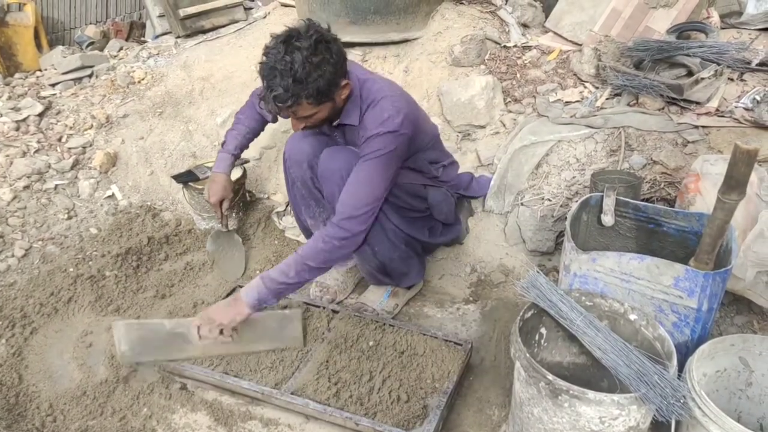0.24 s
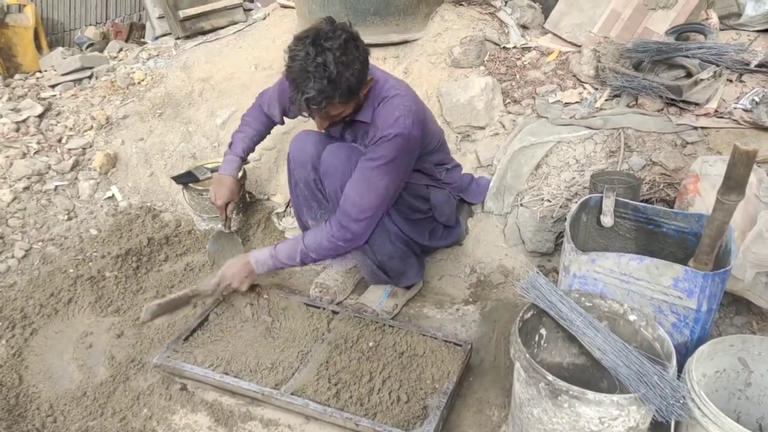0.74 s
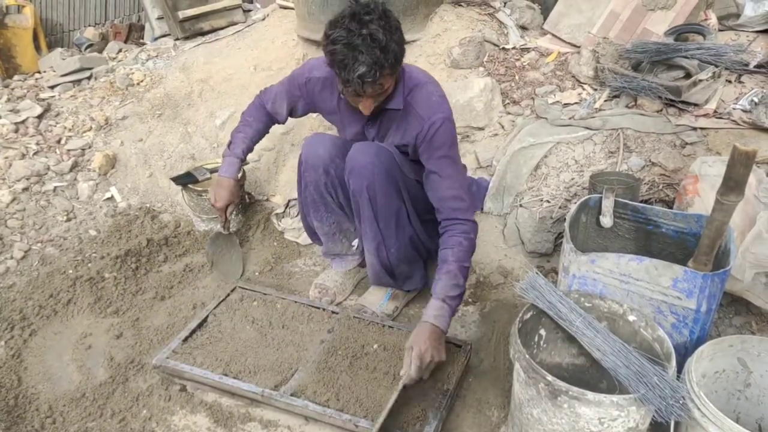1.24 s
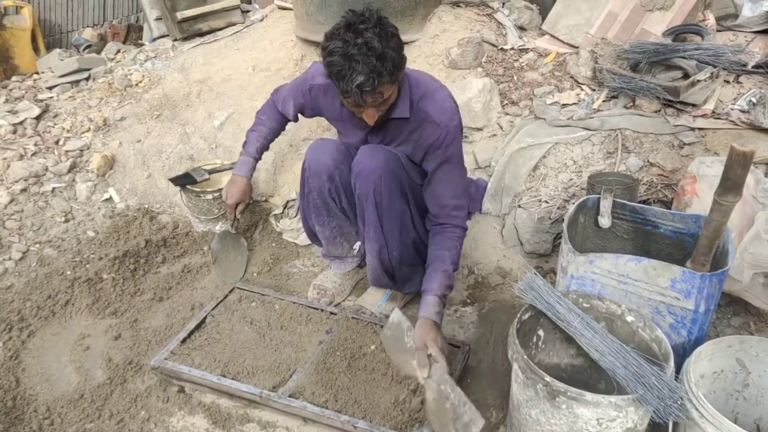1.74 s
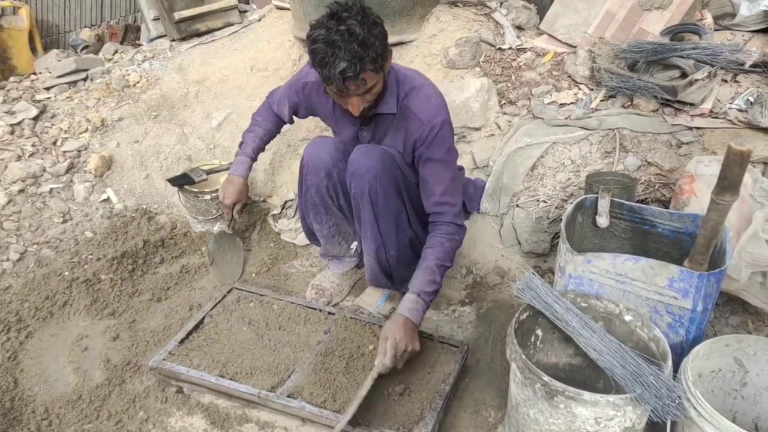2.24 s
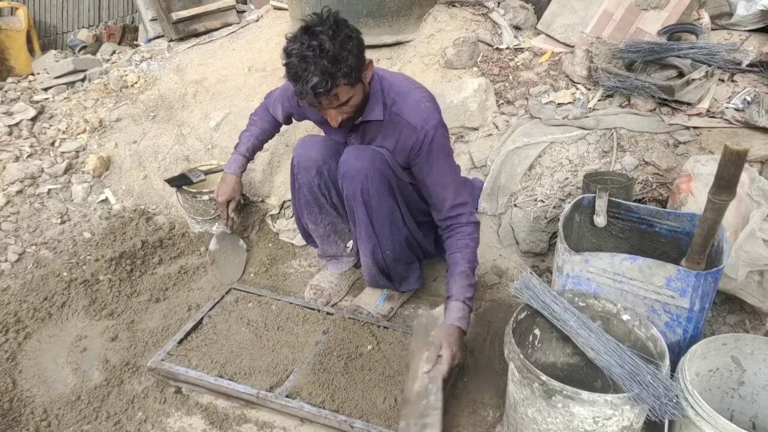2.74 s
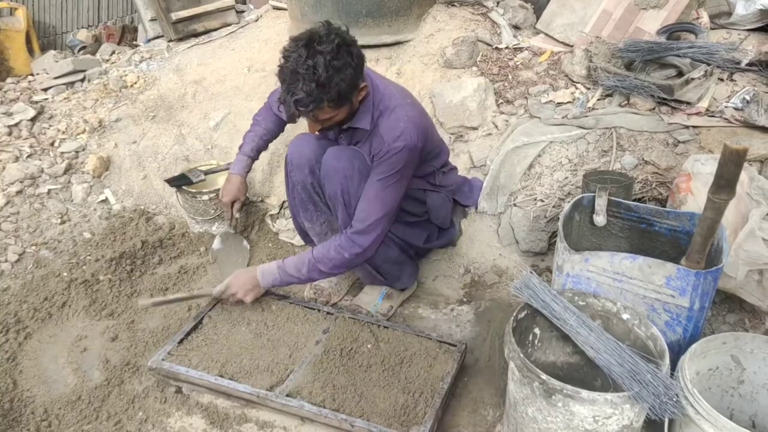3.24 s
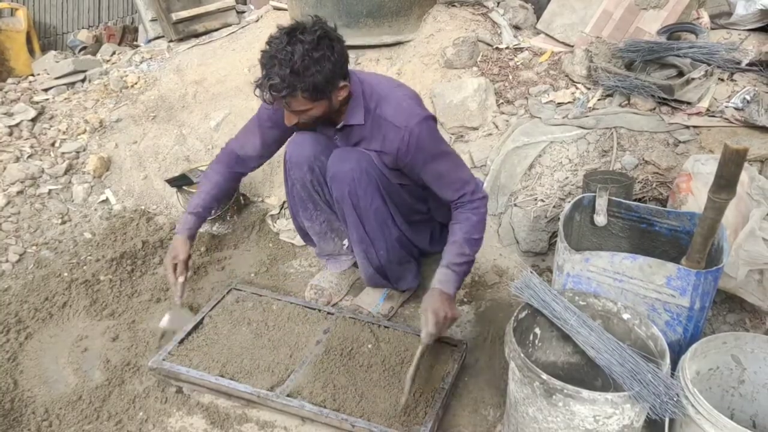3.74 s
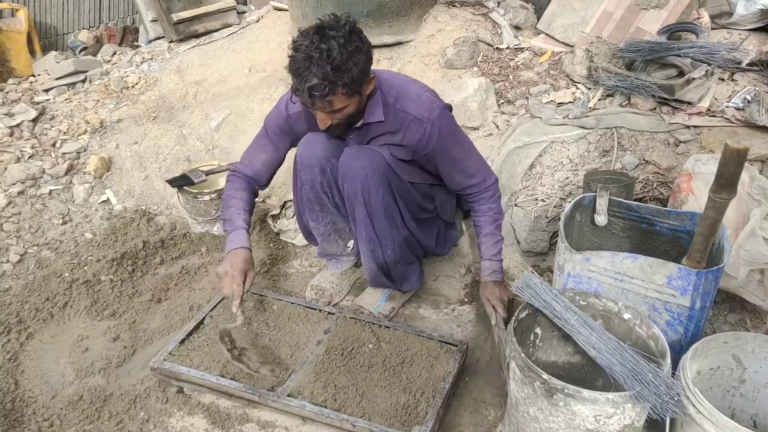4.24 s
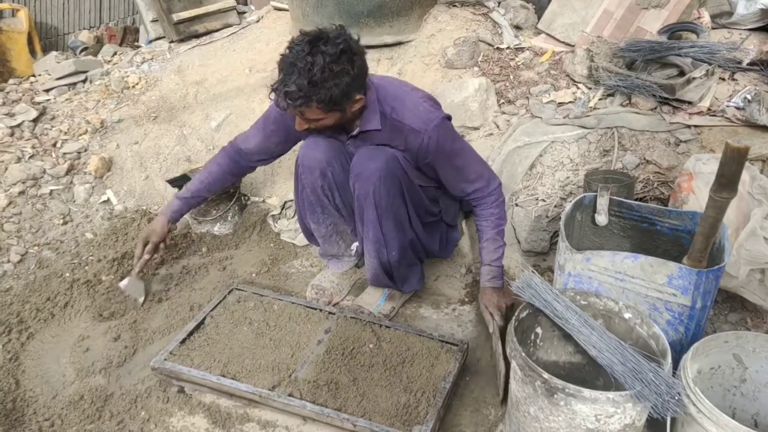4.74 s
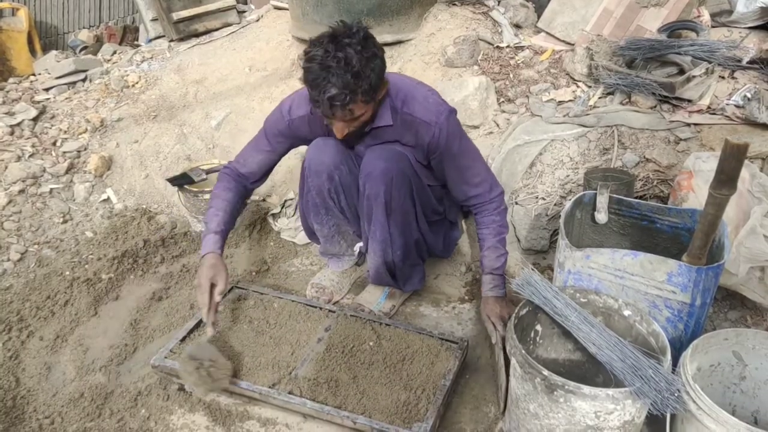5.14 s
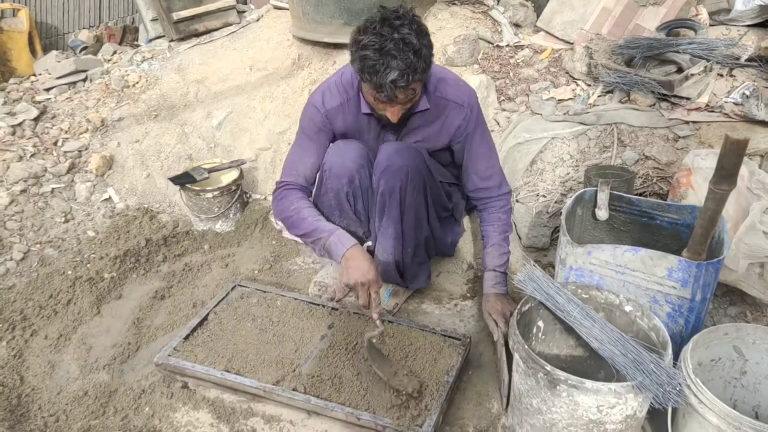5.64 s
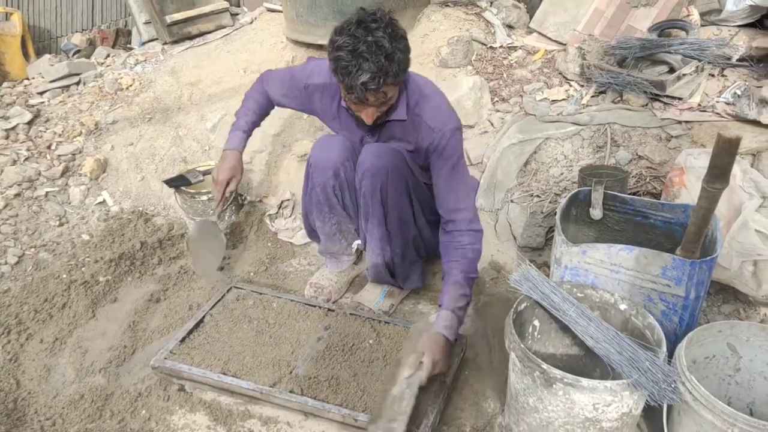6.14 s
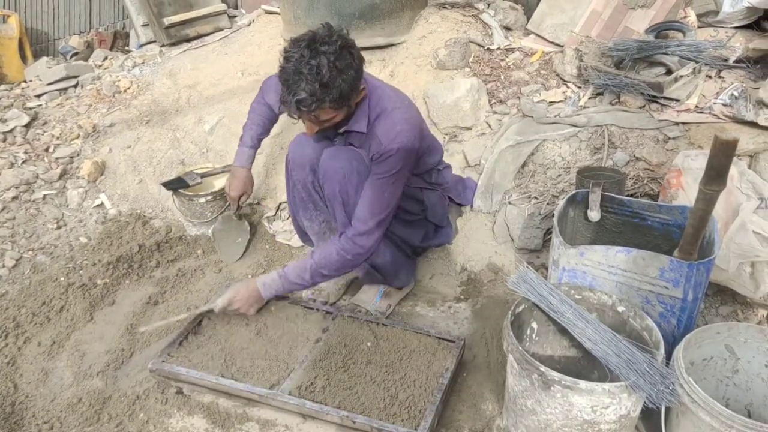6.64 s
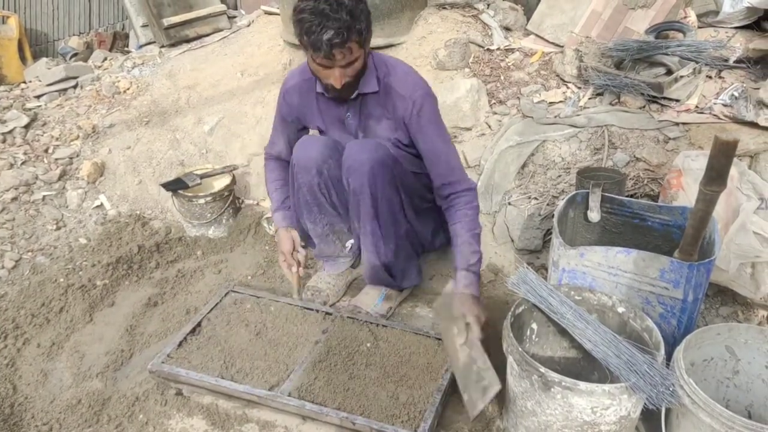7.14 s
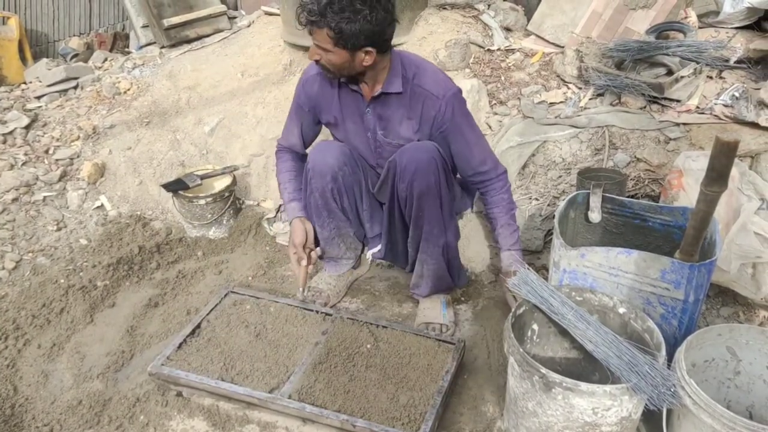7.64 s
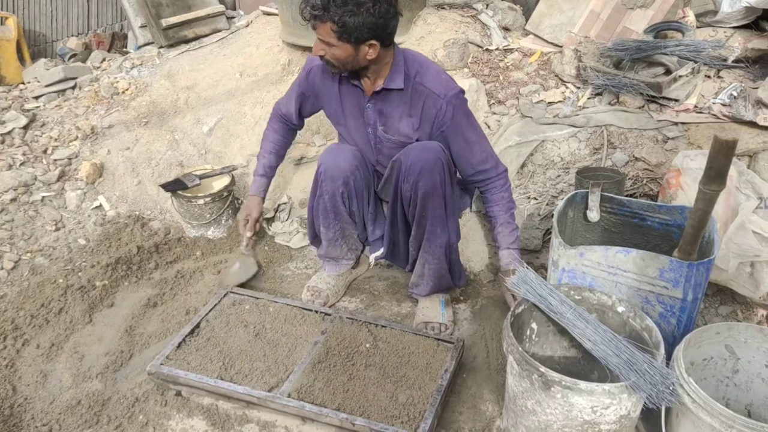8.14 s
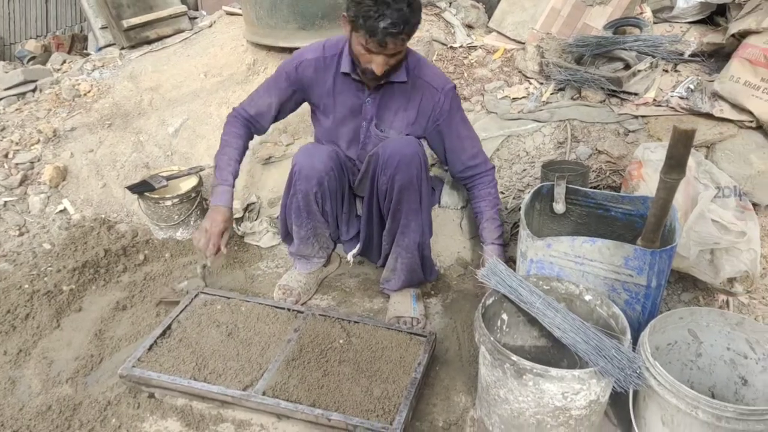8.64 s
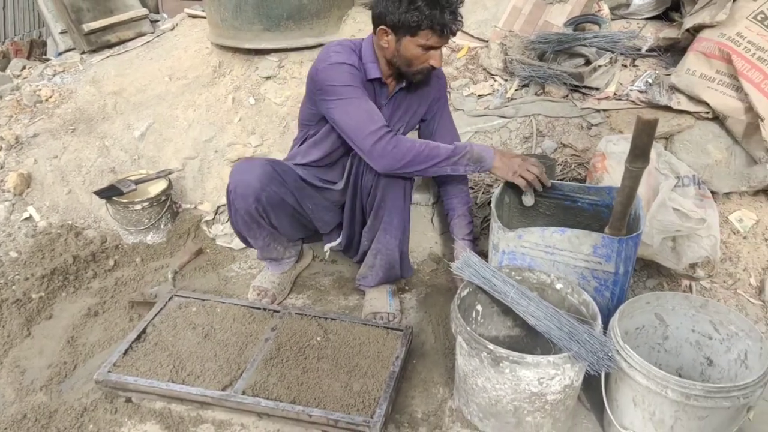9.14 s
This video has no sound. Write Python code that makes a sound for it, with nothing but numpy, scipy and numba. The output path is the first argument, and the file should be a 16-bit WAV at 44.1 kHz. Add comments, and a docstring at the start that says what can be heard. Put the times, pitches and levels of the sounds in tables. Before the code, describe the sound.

Short gritty scrapes and light knocks as a wooden board and steel trowel level damp cement mix in a quiet yard.

```python
"""Striking off sand and cement

A wooden board levels damp mix across a steel mould; a small steel trowel scoops and pats it. Grit catches under
each tool in dense uneven ticks that ring its modes; knocks mark contacts, pebbles crack, faint gritty tails
follow the strokes. A phone with two unlike microphone ports listens from a few steps away in a quiet open yard,
with far traffic and a faint hoarse call."""
import sys
import numpy as np
from scipy import signal
from scipy.io import wavfile
from scipy.ndimage import uniform_filter1d
from numba import njit

SR = 44100
rng = np.random.default_rng(int(sys.argv[2]) if len(sys.argv) > 2 else 0)


def transcribe(signal):
    """Save signal, clipped to [-1, 1], as a 16-bit WAV file at the path in sys.argv[1]."""
    frames = np.atleast_2d(signal).T
    limited = np.clip(frames, -1, 1)
    pcm = np.round(limited * 32767).astype(np.int16)
    wavfile.write(sys.argv[1], SR, pcm)


N = 414539
TIME = np.arange(N) / SR
SLOW = TIME[::64]  # envelope grid
NOISE = rng.standard_normal((2, N))
PART_EDGES_HZ = [550, 1200, 6000]  # splits the four parts: body, hollow, grit, hiss


def undb(db):
    return 10 ** (np.asarray(db) / 20)


def on_log(table, hz, column=1):
    """Table column interpolated over log frequency."""
    table = np.array(table, float)
    return np.interp(np.log(hz), np.log(table[:, 0]), table[:, column])


def walk(per_s, db):
    """Wandering gain: random levels of spread db, joined by straight lines."""
    knots = rng.standard_normal(int(N / SR * 400))
    return np.interp(TIME, SLOW, undb(db * np.interp(SLOW * per_s, np.arange(len(knots)), knots)))


@njit
def moving_band(x, tuning, damping):
    """State-variable band-pass, unity gain at its moving centre."""
    y, band, low = np.empty(len(x)), 0., 0.
    for i in range(len(x)):
        g, k = tuning[i], damping[i]
        v = (band + g * (x[i] - low)) / (1 + g * (g + k))
        band, low, y[i] = 2 * v - band, low + 2 * g * v, k * v
    return y


# Microphone ports: f/Hz, left minus right/dB, likeness/0-1
PORTS = [(300, 0.3, 0.99), (787, 0.3, 0.88), (1390, 1, 0.68), (2740, 15.5, 0.88), (3540, 11, 0),
         (4675, 4, 0.9), (5300, -29, 1), (6700, 10.5, 0.3), (8500, 7, 0.5), (10830, -2.5, 0.2)]
def noise_band(envelope, hz, width_hz, order):
    """Enveloped noise rings one band (order 0: a moving one) and reaches both ports."""
    mid, side = envelope * np.roll(NOISE, rng.integers(N), axis=1)
    like = np.clip(on_log(PORTS, hz, column=2), 0, .998)
    pair = np.sqrt(1 + like) * mid + np.sqrt(1 - like) * side * np.array([[1], [-1]])
    if order:
        edges_hz = [hz - width_hz / 2, min(hz + width_hz / 2, .45 * SR)]
        rung = signal.sosfilt(signal.butter(order, edges_hz, "band", fs=SR, output="sos"), pair)
    else:
        rung = np.array([moving_band(x + 1e-18, np.tan(np.pi * hz / SR), width_hz / hz) for x in pair])
    lean = undb(on_log(PORTS, hz) / 2)
    balance = np.reshape([lean, 1 / lean], (2, -1)) * np.sqrt(2 / (lean ** 2 + lean ** -2))
    return balance * rung * np.sqrt(SR / 4 / width_hz)


# Hush spectrum: f/Hz, relative density/dB
HUSH_SPECTRUM = [(25, -26.5), (59, -18.5), (400, -4), (490, 3), (607, -14.5), (2550, -23), (16000, -55.5)]
def yard_hush(level_db=-70.5):
    """Outdoor hush in half-octave bands that flicker independently."""
    centres_hz = 35 * 2 ** np.arange(0, 9, .5)
    power = undb(2 * on_log(HUSH_SPECTRUM, centres_hz)) * centres_hz
    gains = undb(level_db) * np.sqrt(power / power.sum())
    return sum(noise_band(gain * walk(27, 0.99), hz, hz * 0.42, 2) for hz, gain in zip(centres_hz, gains))


# Traffic rumble: t/s, level/dB
TRAFFIC = [(3.8, -64.5), (4.1, -73.5)]
def far_traffic():
    """A far rumble dies down."""
    level = undb(np.interp(TIME, *np.transpose(TRAFFIC)))
    return noise_band(level * walk(4.7, 3.9), hz=116.5, width_hz=95, order=2)


def grit(per_s, scatter_db, tau_s, rub, judder_db):
    """Pebbles crush at random with very unequal force, over a fine rub; the hand judders."""
    hits = rng.random(N) < per_s / SR
    ticks = decay(hits * undb(scatter_db * np.minimum(rng.exponential(size=N), 2.2)), tau_s)
    force = (rub + ticks / np.sqrt(np.mean(ticks ** 2))) * walk(70, judder_db)
    return force / np.sqrt(uniform_filter1d(force ** 2, size=3000))  # the arm keeps mean effort even


def decay(spikes, tau_s):
    """Exponential tail on each spike."""
    return signal.lfilter([1], [1, -np.exp(-1 / (tau_s * SR))], spikes)


def stray_grains(level_db=-74.5):
    """Stray sand ticks down throughout."""
    ticks = grit(per_s=49, scatter_db=3, tau_s=.005, rub=1.6, judder_db=3)
    return noise_band(undb(level_db) * ticks, hz=2500, width_hz=2600, order=2)


def on_trowel(t):
    """True if the last stroke begun by t is the trowel's."""
    def latest(strokes):
        return max([row[0] for row in strokes if row[0] <= t], default=-1)
    return latest(TROWEL_STROKES) > latest(BOARD_STROKES)


# Gritty tails: t/s, grit level/dB, fall/(dB/s)
GRIT_TAILS = [(-.05, -56, 30), (.6, -53, 60), (1.35, -54.5, 60), (1.91, -53, 99), (2.1, -54.5, 95),
              (2.519, -51.5, 62), (3.402, -50.5, 79), (5.012, -49.5, 129), (6.991, -45, 148),
              (7.74, -56, 111), (8.82, -57, 99.5), (8.938, -63, 185), (9.281, -58.5, 198)]
def grit_tails(is_trowel, run_s=0.35):
    """Part envelopes of faint gritty tails: each fades at its own rate, then dies away."""
    return sum(stroke(t, t + run_s / 2, t + run_s, db, db - fall * run_s / 2, db - fall * run_s,
                      fall_db_s=149.5, body_db=-5, hollow_db=-8, hiss_db=-22)
               for t, db, fall in GRIT_TAILS if on_trowel(t) == is_trowel)


def stroke(touch_s, crest_s, lift_s, touch_db, crest_db, lift_db, fall_db_s, body_db, hollow_db, hiss_db):
    """Part envelopes of one stroke: bite, swell, sag, lift. Low parts start thin until mix heaps up."""
    bite_db_s, thin_db, heap_s = 9001.5, -4.5, 0.1
    db = np.interp(SLOW, [touch_s, crest_s, lift_s], [touch_db, crest_db, lift_db])
    db -= bite_db_s * np.maximum(touch_s - SLOW, 0) + fall_db_s * np.maximum(SLOW - lift_s, 0)
    low_db = db + thin_db * np.exp(-np.maximum(SLOW - touch_s, 0) / heap_s)
    return undb(np.array([low_db + body_db, low_db + hollow_db, db, db + hiss_db]))


def rubbing(strokes, tails, grain):
    """Pressure and rubbing force per part; a light touch brushes sand but crushes no pebbles."""
    parts = sum(stroke(*row[:10]) for row in strokes) + tails
    levels = [np.interp(TIME, SLOW, part) for part in parts]
    pressure = np.clip(levels[2] / undb(-46), .15, 1)
    sand = np.sqrt(grain * grain[::-1])  # fine sand slips partly at its own moments and feeds the hiss
    textures = (grain, grain, grain, sand)
    bites = (0.81, 0.59, 0.66, 0.69)  # pebbles thump the body hardest
    force = [level * rough ** (bite * pressure) for level, rough, bite in zip(levels, textures, bites)]
    return pressure, force


def knocking(knocks, base_tau_s, gain_db=-7):
    """Blow force per part; low blows push longer."""
    blows = np.zeros((4, N))
    for t, db, body, hollow, hiss in knocks:
        blows[:, int(t * SR)] = undb(db + gain_db + np.array([body, hollow, 0, hiss]))
    return [decay(blow, base_tau_s * stretch) for blow, stretch in zip(blows, (2.3, 1.94, 0.83, 1.05))]


def tool_ring(pressure, force, blows, spectrum, modes, bed_db, grip_db, mode_bias_db):
    """Third-octave bed and narrow modes; each wanders as the grip shifts; blows favour the modes."""
    centres_hz = 140 * 2 ** np.arange(0, 6.9, 1 / 3)
    bands = [(hz, hz * 0.23, on_log(spectrum, hz) + bed_db, 2) for hz in centres_hz]
    bands += [(*mode, 1) for mode in modes]
    hz, width_hz, db, order = np.transpose(bands)
    part = np.searchsorted(PART_EDGES_HZ, hz)
    power = undb(2 * db) * width_hz
    share = np.sqrt(power / np.bincount(part, power)[part])
    catch = walk(120, 3.36)  # each pebble favours a few bands
    sound = 0
    for k, p in enumerate(part):
        bright = pressure ** (0.16 * np.clip(np.log2(hz[k] / 2600), 0, 1))  # a light touch is duller
        rub = force[p] * np.roll(catch, rng.integers(N)) * bright
        grip = walk(18, grip_db * (3 - order[k]))  # modes wander twice as far
        blow = blows[p] * undb(mode_bias_db * (1.5 - order[k]))
        sound += share[k] * noise_band(rub * grip + blow, hz[k], width_hz[k], int(order[k]))
    return sound


# Board strokes: touch, crest, lift t/s; grit level at each/dB; fall after lift/(dB/s);
# body, hollow, hiss/dB re grit; free edge f/Hz; edge glide/(1/s)
BOARD_STROKES = [(0.033, 0.145, .34, -52.5, -34, -45, 400, -6.5, -7, -15, 2536, 0.12),
                 (0.36, 0.558, 0.59, -37, -34, -38.5, 702, -16.5, -11, -14.5, 3316, .2),
                 (0.863, 1.09, 1.095, -37.5, -32, -33, 799, -10.5, -8.5, -15.5, 2560, 0.14),
                 (1.128, 1.214, 1.354, -30, -30, -43, 433, -7.5, -7, -15, 2270, 0.49),
                 (1.618, 1.753, 1.877, -43.5, -33.5, -38, 400, -9, -13, -11.5, 2850, 0.27),
                 (2.016, 2.076, 2.143, -42.5, -36.5, -59.5, 309, -8, -10, -10.5, 2850, 0.23),
                 (2.3, 2.413, 2.48, -43.5, -34, -32.5, 430, -9.5, -10, -15.5, 2700, 0.094),
                 (2.711, 2.857, 2.93, -41.5, -35.5, -37.5, 298, -11, -11, -13.5, 2970, 0.00044),
                 (2.93, 3.024, 3.38, -38.5, -33.5, -38, 700, -6, -4, -19.5, 2220, 0.25),
                 (6.143, 6.187, 6.614, -42.5, -35, -36.5, 300.5, -5, -7, -12.5, 3050, -0.43),
                 (6.598, 6.756, 6.85, -43, -32, -47, 301.5, -8, -4, -17, 2520, -.3),
                 (7.075, 7.12, 7.315, -31.5, -29, -31, 595, -13, -14.5, -13.5, 1440, 1.35),
                 (7.339, 7.46, 7.59, -39, -36.5, -41, 620, -5, -10, -22, 1830, 0.26),
                 (9.348, 9.381, 9.5, -62.5, -48.5, -43, 300, 3.5, 0, -11, 2800, 0.29)]
# Board contacts: t/s, relative level/dB; body, hollow, hiss/dB re level
BOARD_KNOCKS = [(0.0352, -28, -26, -4.5, -39), (0.081, -15, -9, -19, -23), (0.368, -12, -14, -26, -29),
                (0.5018, -12.5, -64, -53, -22), (0.8668, -13.5, -21.5, -25, -10.5),
                (1.086, -18, -7, -12, -30), (1.115, -10, -7, -9.5, -23), (1.6497, -13, -10, -40, -15),
                (2.0625, -10.5, -44, -21, -13), (2.3132, -28, 9.5, 2.5, -30), (2.7168, -3, -19, -29, -11),
                (6.992, -26.5, -9.5, -3.5, -14), (7.038, -10, -26, -23, -24),
                (7.0541, -12, -10.5, -5.5, -17), (7.0805, -5.5, -18, -30, -16), (7.2725, -4, -20, -31, -34)]
# Board bed: f/Hz, relative density/dB
BOARD_SPECTRUM = [(120, -12), (210, 4), (327, 9), (630, -13), (892, -7.5), (2300, -4), (4230, -10.5),
                  (6110, -16.5), (9990, -40), (14700, -35)]
# Board modes: f/Hz, width/Hz, relative density/dB
BOARD_MODES = [(281.7, 63, 2), (868, 170, -5.5), (2680, 70, -3), (4660, 81, -14)]
def board():
    """Wood dragged over the mix, rung by grit and knocks. Returns sound and grit force."""
    grain = grit(per_s=240, scatter_db=6, tau_s=0.0008, rub=0.8, judder_db=1.76)
    pressure, force = rubbing(BOARD_STROKES, grit_tails(is_trowel=False), grain)
    blows = knocking(BOARD_KNOCKS + cracks(is_trowel=False), base_tau_s=0.0034)
    sound = tool_ring(pressure, force, blows, BOARD_SPECTRUM, BOARD_MODES,
                      bed_db=-1.4, grip_db=2.33, mode_bias_db=7.7)
    return sound, force[2]


def free_edge(force, upper_ratio=1.62, upper_db=-4.5):
    """The mix leaves a changing length of edge free; two rings retune per stroke, gliding for the board."""
    rows = [(row[0], *row[10:]) for row in BOARD_STROKES]
    rows += [(row[0], row[10], 0) for row in TROWEL_STROKES]
    touch_s, start_hz, glide = np.array(sorted(rows)).T
    now = np.searchsorted(touch_s[1:], TIME)
    hz = start_hz[now] * (1 + glide[now] * np.clip(TIME - touch_s[now], 0, .5))
    hz = uniform_filter1d(hz, size=300) * walk(22, 0.2)
    upper = noise_band(force * undb(upper_db) * walk(22, 2.25), upper_ratio * hz, width_hz=140, order=0)
    return noise_band(force * walk(22, 4.2), hz, width_hz=87, order=0) + upper


# Call contours, one list per call: t/s, f/Hz, level/dB
FAR_CALLS = [
    [(.6, 703, -55.5), (.86, 705, -60.5)],
    [(3.96, 600, -67), (4.28, 667.3, -66.5), (4.47, 607, -72)],
    [(5.34, 580, -70.5), (5.56, 596, -66)],
]
# Call overtones: multiple of f, relative level/dB
CALL_OVERTONES = [(2, -3.5), (3, -5.5)]
def far_calls(fade_s=.04, off_db=-110):
    """A hoarse call far off, perhaps a fowl; each overtone is a narrow wavering band."""
    rows = []
    for call in FAR_CALLS:
        first, last = call[0], call[-1]
        rows += [(first[0] - fade_s, first[1], off_db), *call, (last[0] + fade_s, last[1], off_db)]
    t, hz, db = np.transpose(rows)
    swell, pitch_hz = undb(np.interp(TIME, t, db)), np.interp(TIME, t, hz)
    return sum(noise_band(swell * undb(rel_db), multiple * pitch_hz, width_hz=45, order=0)
               for multiple, rel_db in CALL_OVERTONES)


# Return skims: hold start t/s, hold end t/s, level/dB
SWISHES = [(1.566, 1.633, -41.5), (2.246, 2.334, -41.5)]
def swishes(rise_db_s=174.5, fall_db_s=299):
    """The board skims loose sand on its way back: a dull rasp that ends as it lands."""
    db = [level - rise_db_s * np.maximum(start - SLOW, 0) - fall_db_s * np.maximum(SLOW - end, 0)
          for start, end, level in SWISHES]
    swell = np.interp(TIME, SLOW, undb(db).sum(axis=0)) * walk(60, 0.72)
    return noise_band(swell, hz=1775, width_hz=1200, order=2)


# Pebble cracks: t/s, relative level/dB
CRACKS = [(2.791, -32), (2.983, -20.5), (3.075, -23), (3.158, -25), (3.304, -13.5), (6.326, -18),
          (6.759, -25), (8.164, -17), (8.18, -21), (8.718, -17.5), (8.956, -40)]
# Crack colour, board row then trowel row: body, hollow, hiss/dB re level
CRACK_PARTS_DB = [(-13.5, -20.5, -27), (-43, -31, -24)]
def cracks(is_trowel):
    """Single pebbles crack under the tool in use. Returns knock rows."""
    return [(t, db, *CRACK_PARTS_DB[int(is_trowel)]) for t, db in CRACKS if on_trowel(t) == is_trowel]


# Trowel strokes: touch, crest, lift t/s; grit level at each/dB; fall after lift/(dB/s);
# body, hollow, hiss/dB re grit; free edge f/Hz
TROWEL_STROKES = [(3.57, 3.576, 3.67, -36, -40.5, -56, 450, -7, 0.5, -24, 1540),
                  (3.635, 3.91, 3.9, -33, -29, -29.5, 216, -23.5, -16.5, -17.5, 1590),
                  (4.131, 4.167, 4.2, -69, -48, -57.5, 350, 4.5, -2.5, -6.5, 1650),
                  (4.734, 4.911, 5, -39, -28, -36.5, 505, -16, -10, -15, 1485),
                  (5.542, 5.573, 5.67, -67, -47, -50.5, 600.1, -20.5, -13.5, -13, 2680),
                  (5.738, 5.752, 5.76, -48, -42, -45, 710, -17, -14, -19, 2520),
                  (5.815, 5.891, 5.88, -64.5, -49, -67, 262, 1.5, -6, -11, 2660),
                  (7.521, 7.54, 7.52, -47, -42.5, -49, 700, -7, -20, -30, 2730),
                  (7.616, 7.68, 7.75, -48.5, -40, -43.5, 457, 0.5, -7.5, -20, 2740),
                  (7.813, 7.887, 7.89, -62, -44.5, -46.5, 247, 1, -12, -26, 1620),
                  (7.979, 7.993, 8, -45, -45, -43.5, 450, -4, -8, -20, 1480),
                  (8.079, 8.092, 8.14, -37, -35, -46, 400, -20, -12.5, -21, 1520),
                  (8.156, 8.179, 8.24, -48, -31.5, -32.5, 297, -43, -33, -12, 1495),
                  (8.47, 8.53, 8.8, -56, -32, -39, 420, -26.5, -16, -11.5, 2699)]
# Trowel contacts: t/s, relative level/dB; body, hollow, hiss/dB re level
TROWEL_KNOCKS = [(3.5716, -26.5, 2, 1, -29), (3.6173, -23.5, -14, -4, -14), (3.6364, -20, -7.5, 3, -25),
                 (4.126, -31.5, -9, -10, -14), (4.156, -26.5, -12.5, -5, -7), (7.5214, -20, -4.5, 8.5, -30),
                 (7.7049, -13, -14, -3, -38), (7.8967, -22, -8, 1, -35), (7.955, -44, 12, -8, -30),
                 (7.9828, -29.5, -14, -7, -30), (8.08, -18, -58, -40, -24), (8.148, -14.5, -34, -28, -27),
                 (8.281, -14.5, -57, -34, -33.5), (8.6474, -6, -51, -43, -41),
                 (8.694, -20, -49, -25.5, -36), (8.7423, -22, -37, -32, -16),
                 (8.765, -20, -30.5, -42, -12.5), (8.8011, -22, -22, -38, -19),
                 (8.9392, -34.5, -25.5, -39, -14), (9.0023, -47, -17, -30, -2)]
# Trowel bed: f/Hz, relative density/dB
TROWEL_SPECTRUM = [(120, -28), (362, -10.5), (592, -27), (727, -10.5), (2150, -3), (2750, -5.5),
                   (3900, -3.5), (6000, -14.5), (9800, -35.5), (15000, -26.5)]
# Trowel modes: f/Hz, width/Hz, relative density/dB
TROWEL_MODES = [(331, 43, -12), (918, 56, -8.5), (1495, 31, 2.5), (1778, 20, -4), (1995, 27, -3),
                (2390, 65, -3), (3050, 40, -3), (2747, 64, 6), (3320, 53, -5), (3884, 90, -3.5),
                (4526, 160, -8), (6040, 320, -15), (8640, 200, -22)]
def trowel():
    """Steel scoops and pats the mix, ringing many narrow modes. Returns sound and grit force."""
    grain = grit(per_s=350, scatter_db=4.9, tau_s=0.00077, rub=1.0, judder_db=1.8)
    pressure, force = rubbing(TROWEL_STROKES, grit_tails(is_trowel=True), grain)
    blows = knocking(TROWEL_KNOCKS + cracks(is_trowel=True), base_tau_s=0.003)
    sound = tool_ring(pressure, force, blows, TROWEL_SPECTRUM, TROWEL_MODES,
                      bed_db=-6.0, grip_db=2.3, mode_bias_db=7.0)
    return sound, force[2]


def port_lag(left, mean_s=1e-4, drift_s=5.28e-5, band_hz=(860, 5020)):
    """The left port is further from the work: its mid band lags, drifting as the hands move."""
    lag_s = mean_s + drift_s * 20 * np.log10(walk(4.6, 1))
    mids = signal.sosfiltfilt(signal.butter(2, band_hz, "band", fs=SR, output="sos"), left)
    return left - mids + np.interp(TIME - lag_s, TIME, mids)


def scene():
    """Both tools at the mould, over the quiet yard."""
    wood, wood_force = board()
    steel, steel_force = trowel()
    work = wood + steel + swishes() + free_edge(undb(-7.5) * wood_force + undb(-9.5) * steel_force)
    work[0] = port_lag(work[0])
    return work + yard_hush() + far_traffic() + stray_grains() + far_calls()


def record(dry):
    """The phone cuts the top."""
    top_hz = 15800
    return signal.sosfilt(signal.ellip(10, .2, 70, top_hz, fs=SR, output="sos"), dry)


dry = scene()
out = record(dry)
transcribe(out)
```